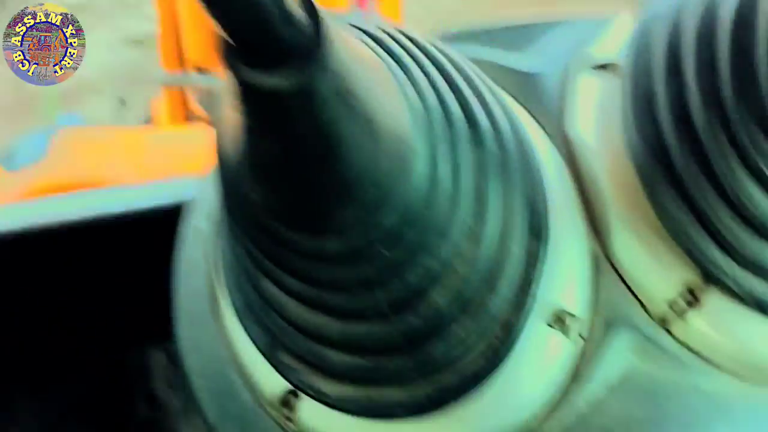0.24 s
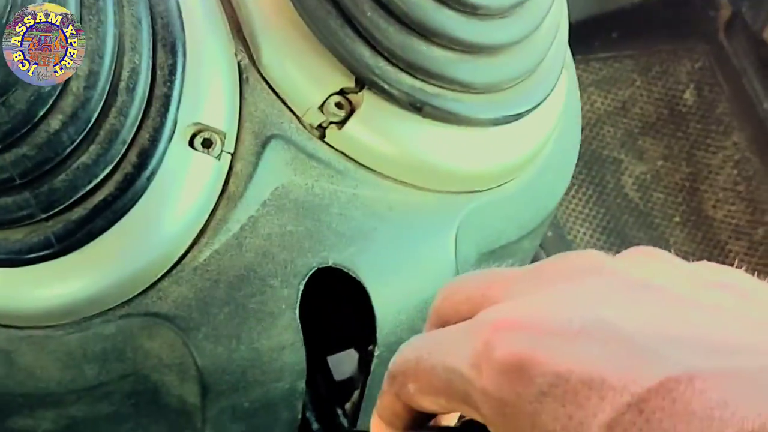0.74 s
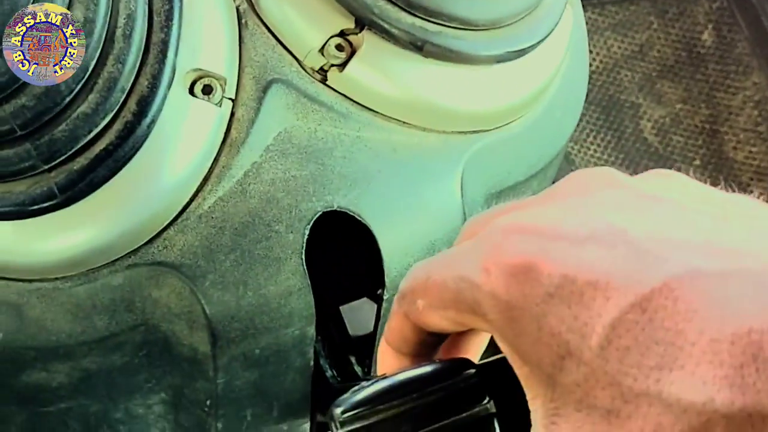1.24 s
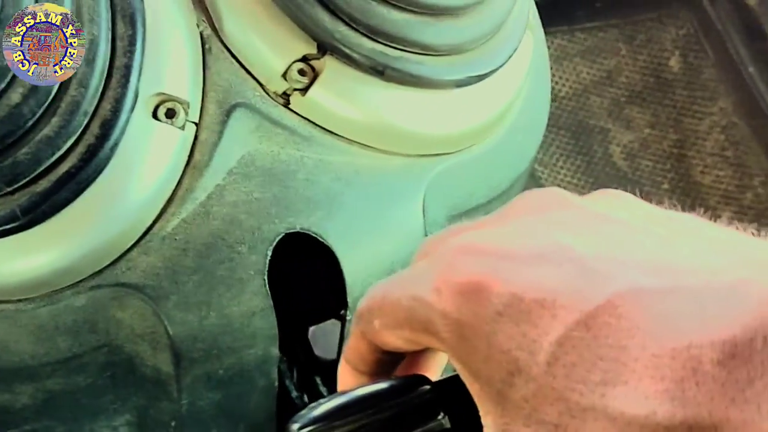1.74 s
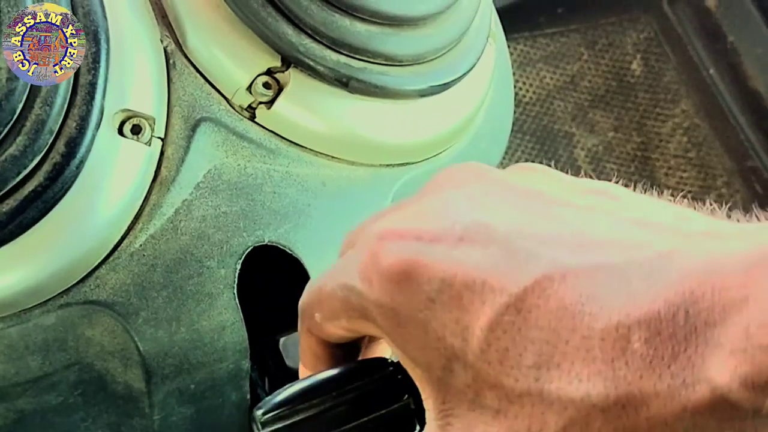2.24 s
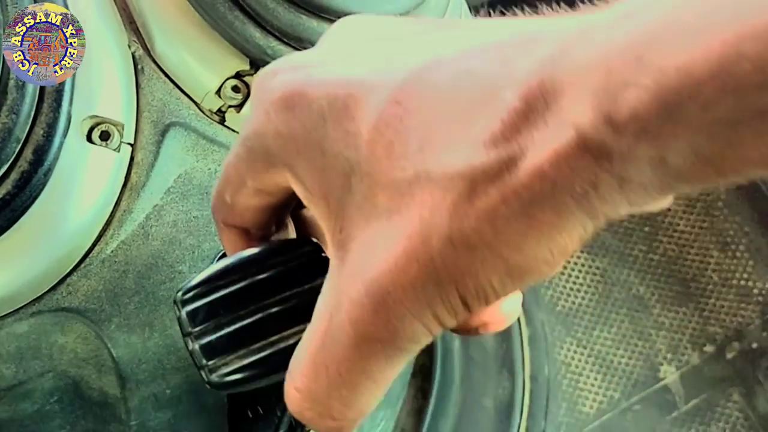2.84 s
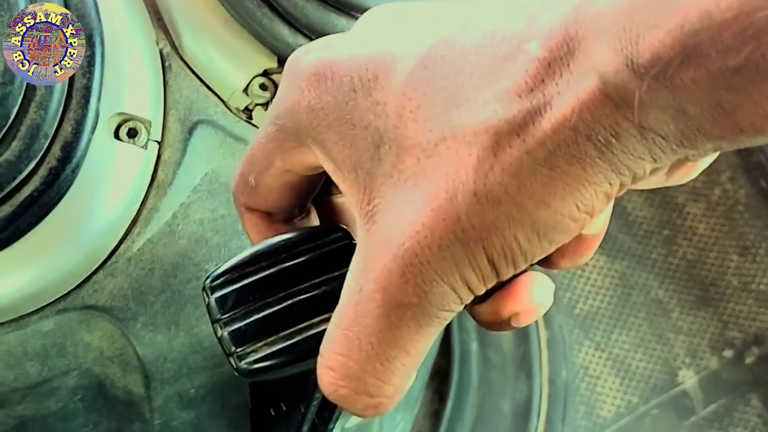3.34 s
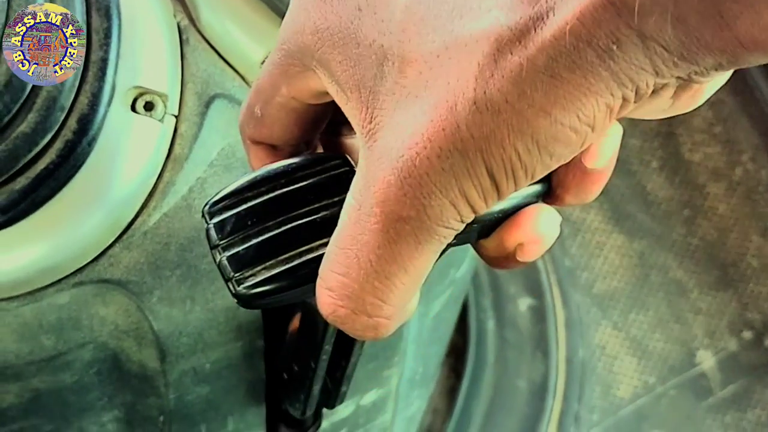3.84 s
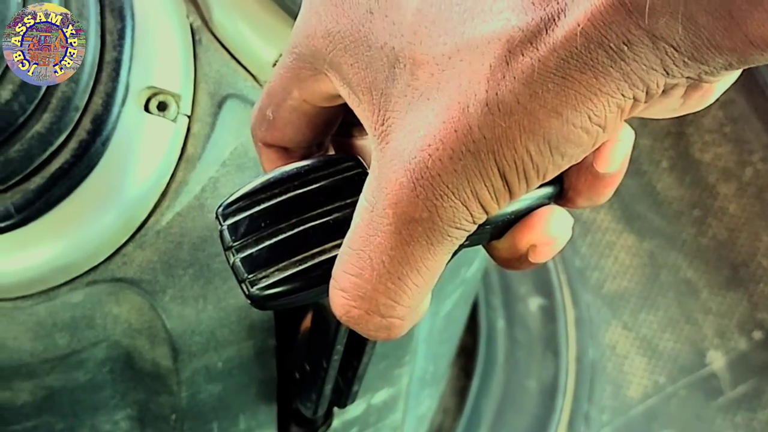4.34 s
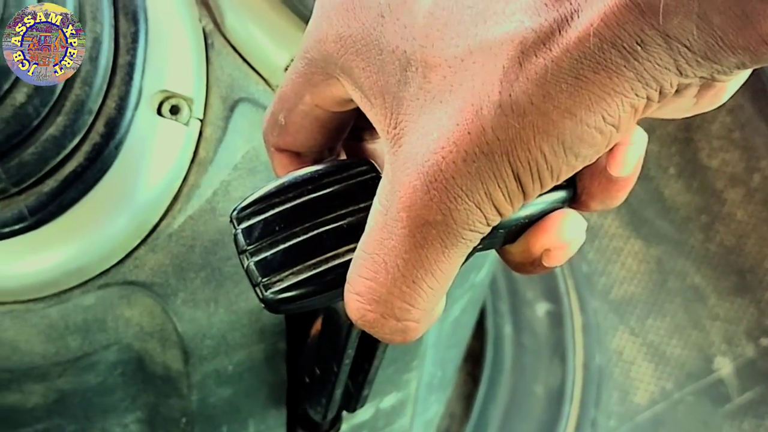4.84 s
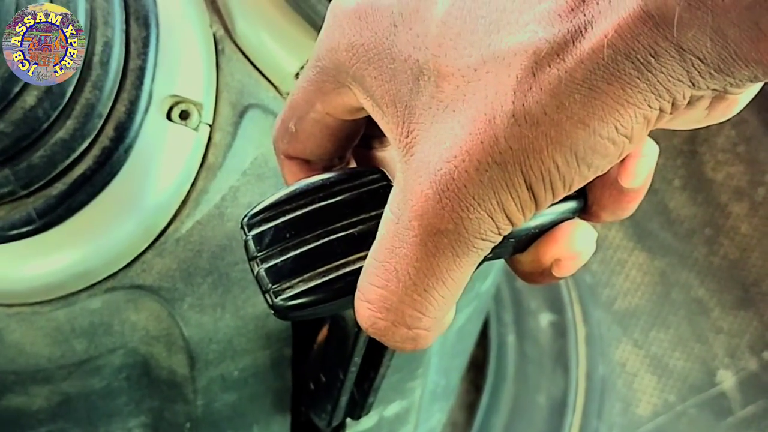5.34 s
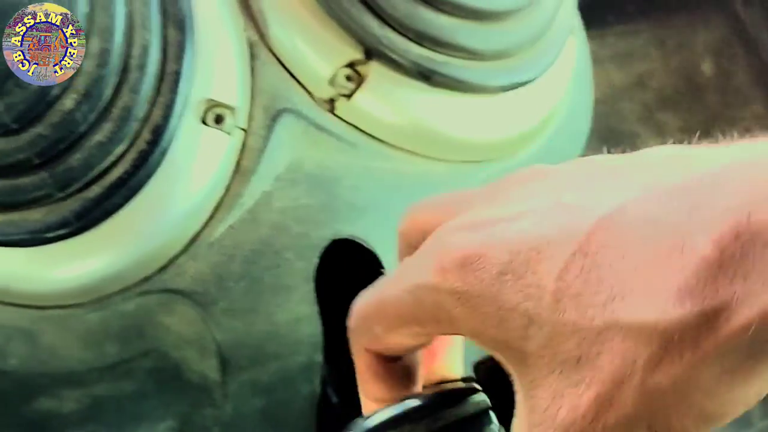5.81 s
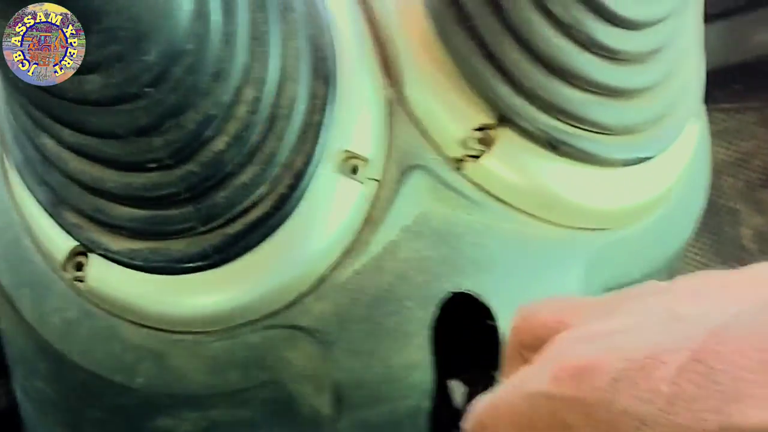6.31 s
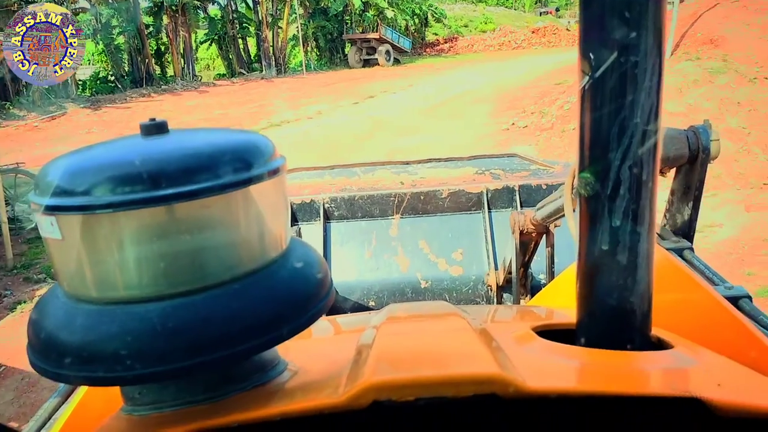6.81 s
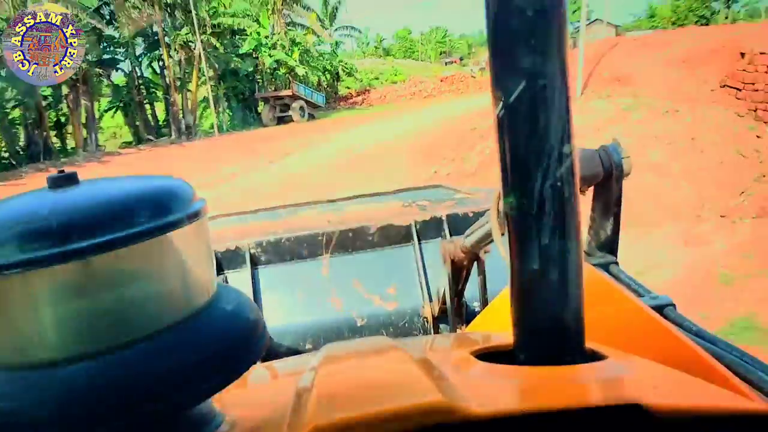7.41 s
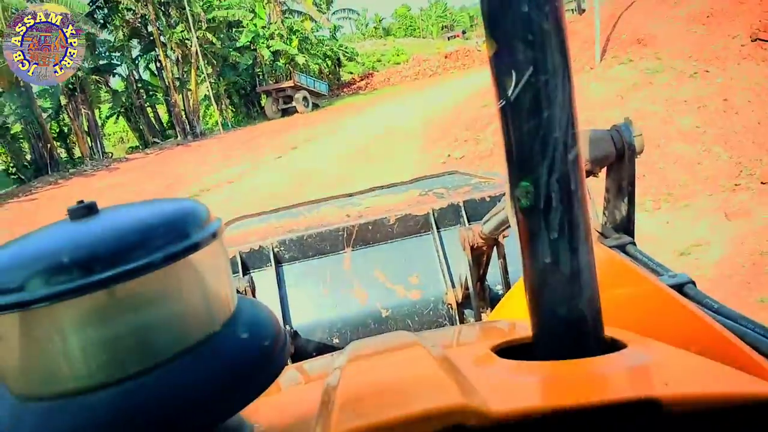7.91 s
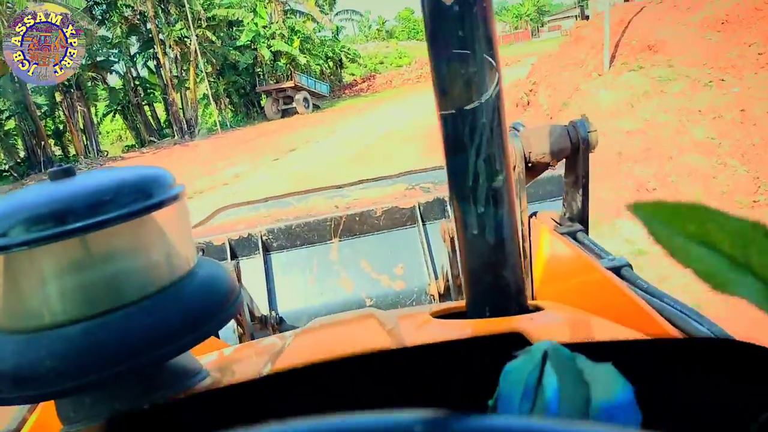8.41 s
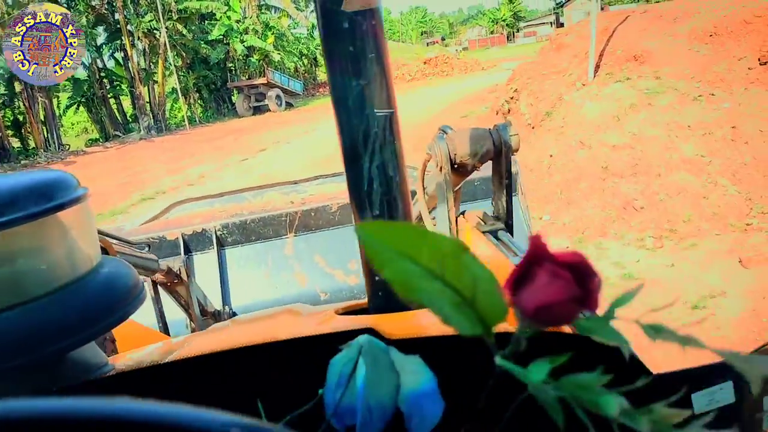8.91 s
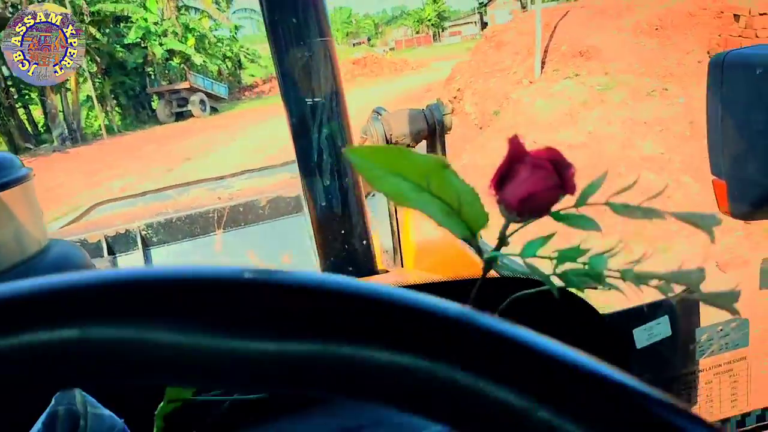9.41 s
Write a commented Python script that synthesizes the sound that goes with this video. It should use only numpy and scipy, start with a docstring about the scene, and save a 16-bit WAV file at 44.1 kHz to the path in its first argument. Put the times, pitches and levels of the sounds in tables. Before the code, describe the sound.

From 0 s a four-cylinder diesel runs just above idle inside a cab, about 33 firings a second, with low throb, boom, loose rattle and faint gear whine. At 2.7 s a lever opens the hydraulics: a tiny spurt, then thin high oil hiss, and the boom grows. At 3.7 s the valve opens fully; the engine sags slightly, booms harder and the hiss strengthens. Between 5.0 and 5.6 s muffled metal linkages judder, most strongly near 5.26 s, while the hiss shuts off and revs lift. Total silence lasts from 6.24 to 6.88 s. The engine then returns, swelling quickly, less boomy with brighter clatter. Faint knocks and taps lead to a sharp gritty scrape at left near 7.5 s. From 8.1 s it revs up with a brief overshoot, firmer and faster; a barely audible hiss fades by 9 s, boom recedes, and a faint clunk comes at 9.25 s.

```python
"""In the cab of a backhoe loader, a four-cylinder diesel runs near idle: tones and rattle locked to its firings.
A lever is pulled: the hydraulics take load, the cab booms at its air resonance, and oil hisses through the
valve as a turbulent jet. Linkages clunk as brief judders that ring the steel frame. After a short silent break
the microphone faces the bonnet; something brushes it with gritty noise and the engine picks up speed."""
import sys
import numpy as np
from scipy import signal
from scipy.fft import rfft, irfft
from scipy.io import wavfile
from scipy.ndimage import uniform_filter1d, map_coordinates

SR = 44100
rng = np.random.default_rng(int(sys.argv[2]) if len(sys.argv) > 2 else 0)


def digitize_waveform(pressure):
    """Quantize a signal to 16-bit integers and store it at the path in sys.argv[1].

    Rows of a 2-D input are taken as channels; values are limited to [-1, 1].
    """
    field = np.atleast_2d(pressure).T
    bounded = np.clip(field, -1, 1)
    quanta = np.round(bounded * 32767).astype(np.int16)
    wavfile.write(sys.argv[1], SR, quanta)


N = 426006
T = np.arange(N) / SR  # time, s
HZ = np.maximum(np.fft.rfftfreq(N, 1 / SR), 1)  # frequency axis, Hz
BREAK_S = (6.236, 6.883)  # start and end of the silence
BONNET = T > np.mean(BREAK_S)  # true once the microphone faces the bonnet
SIDES = np.array([[1], [-1]])  # sign of a left-right difference


def undb(db):
    """Level law: decibels become an amplitude ratio."""
    return 10 ** (np.asarray(db) / 20)


def unit(x):
    """Normalisation: scale to an rms of 1."""
    return x / np.sqrt(np.mean(x ** 2))


def colour(points):
    """Spectral envelope: (Hz, dB) points joined by straight lines over log frequency, as a gain."""
    hz, db = np.transpose(points)
    return undb(np.interp(np.log(HZ), np.log(hz), db))


def resonance(f, hz, width):
    """Simple resonator: the complex response of one damped mode, with gain 1 at its centre."""
    return 1 / (1 + 1j * (f / hz - hz / f) * hz / width)


def shape(x, gain):
    """Linear filtering: multiply the spectrum by a frequency response."""
    return irfft(rfft(x) * gain, N)


def noise():
    """Incoherence: two unrelated white noises."""
    return rng.standard_normal((2, N))


def walk(rate):
    """Slow fluctuation: low-passed noise of rms 1, its response halved at the rate in Hz."""
    return unit(shape(rng.standard_normal(N), 1 / (1 + (HZ / rate) ** 4)))


def since(s):
    """Elapsed time: seconds passed since a moment, zero before it."""
    return np.maximum(T - s, 0)


def ramp(s, length_s):
    """Smooth transition: a sine-squared move from 0 to 1."""
    return np.sin(np.pi / 2 * np.minimum(since(s) / length_s, 1)) ** 2


def lag(x, time_s):
    """First-order relaxation: follow a control sluggishly, with a time constant."""
    step = 1 / (time_s * SR)
    return signal.lfilter([step], [1, step - 1], x)


# Stereo width of the sound field. Each row: frequency in Hz, side minus mid level in dB.
WIDTH = [(60, -11.5), (150, -12), (320, -12), (550, -5), (1000, 1.5), (15000, -1.5)]


def spread(pair):
    """Diffuseness: unrelated mid and side sounds leave the bass alike in both ears and the treble diffuse."""
    mid, side = pair
    return mid + SIDES * shape(side, colour(WIDTH))


# Throttle settings. Each row: start in seconds, firing rate asked for in Hz.
THROTTLE = [(0, 33.47), (5.48, 34.72), (6.5, 32.12), (8.08, 36.7)]
HUNT_HZ, SETTLE_S = 2.4, .13  # rate of the governor's swing and its decay time


def governor():
    """Damped oscillation: the firing rate swings past each throttle setting and settles like a sprung mass."""
    hz = THROTTLE[0][1]
    w = 2 * np.pi * HUNT_HZ
    for (_, old), (s, new) in zip(THROTTLE, THROTTLE[1:]):
        age = since(s)
        swing = np.cos(w * age) + np.sin(w * age) / (w * SETTLE_S)
        hz = hz + (new - old) * (1 - np.exp(-age / SETTLE_S) * swing)
    return hz


REV_S = .22  # time constant with which the revved sound builds


def states(load):
    """Superposition: the shares of idling, under load, at the bonnet and revved add up to one."""
    revved = 1 - np.exp(-since(THROTTLE[-1][0]) / REV_S)
    return np.array([(1 - load) * ~BONNET, load * ~BONNET, (1 - revved) * BONNET, revved * BONNET])


# Base levels in dB, before effort and cab resonance: idling, under load, at the bonnet, revved.
THUD_DB = (-19.5, -18.5, -20.5, -17.5)
BOOM_DB = (-18, -11.2, -23.5, -18.5)
CLATTER_DB = (-30.5, -30.5, -32, -32)
# Extra fuel hardens the firings. Each lists dB added to thud, boom, clatter:
SURGE_DB = (-0.5, 9, 2)  # at the fastest run-up
STRAIN_DB = (.5, 2, 2.5)  # per unit of load not yet caught
# The boom fades as the microphone moves over to the steering wheel. Each row: time in seconds, change in dB.
BOOM_FADE = [(8.65, 0), (9.66, -4.5)]
CAB_HZ, CAB_WIDTH_HZ = 99, 15.8  # the air resonance that the third firing tone booms on
RETURN_DB, RETURN_S = -4.5, .14  # drop just after the break, and the time constant of its recovery


def levels(hz, state, surge, strain):
    """Forced resonance: state and effort set thud, boom and clatter in dB; the boom peaks at the right speed."""
    swell_db = RETURN_DB * BONNET * np.exp(-since(BREAK_S[1]) / RETURN_S)
    base_db = np.array([THUD_DB, BOOM_DB, CLATTER_DB]) @ state + swell_db
    effort_db = np.outer(SURGE_DB, surge) + np.outer(STRAIN_DB, strain)
    thud_db, boom_db, clatter_db = base_db + effort_db
    tuning_db = 20 * np.log10(np.abs(resonance(3 * hz, CAB_HZ, CAB_WIDTH_HZ)))
    fade_db = np.interp(T, *np.transpose(BOOM_FADE))
    return thud_db, boom_db + tuning_db + fade_db, clatter_db


# Exhaust and block tones. Each row: cycles per four firings, then mean level in dB relative to the cab boom
# when idling, under load, at the bonnet, revved.
DRONE = [(6, -30, -31, -23, -29), (8, -9.5, -14.5, -6, -10), (10, -10.5, -23, -26, -9),
         (11, -27.5, -37, -33, -26), (13, -22, -20, -36, -35), (14, -40.5, -49, -19, -41),
         (16, -29, -21, -16, -5), (20, -49, -40.5, -12.5, -19), (24, -39.5, -36, -14.5, -21),
         (28, -25, -21.5, -36, -27), (36, -18, -31.5, -17, -56)]


def drone(firings, hz, state, thud_db, boom_db, waver_db=2.0, panel_hz=208, panel_width=4.46, panel_db=-26):
    """Harmonic series of the firings: the third tone drives the cab air, the sixth a panel at its resonance."""
    def tone(order):
        # pipe and cab hold the higher tones back, which rounds each firing, more so by the bonnet
        phase_lag = np.where(BONNET, .5, .13) * order ** 2  # radians
        return np.sqrt(2) * np.cos(2 * np.pi * order * firings - phase_lag)

    thud = undb(thud_db) * tone(order=1)
    boom = undb(boom_db + .4 * walk(12)) * tone(order=3)
    out = thud + boom
    for cycles, *db in DRONE:
        level_db = boom_db + np.array(db) @ state + waver_db * walk(16)
        out += undb(level_db) * tone(order=cycles / 4)
    panel = np.abs(resonance(6 * hz, panel_hz, panel_width)) ** 2
    return out + undb(panel_db) * panel * tone(order=6)


def rumble(boom_db, state, cab_hz=104, cab_width=55, state_db=(-17, -19, -11, -9)):
    """Random excitation of a cavity: uneven combustion stirs the cab air between the tones."""
    air = unit(spread(shape(noise(), resonance(HZ, cab_hz, cab_width) ** 2)))
    return air * undb(boom_db + np.array(state_db) @ state)


def knocks(firings, state, flutter_db=1.06, knock=0.62, chatter_db=0.96):
    """Cyclic impacts: injectors, valves and gears rattle partly alike every four firings, the treble afresh."""
    cycle = firings / 4 % 1

    def each_cycle(size):
        # a random pattern of this many points, replayed once per cycle
        return map_coordinates(rng.standard_normal(size), [cycle * size], order=3, mode="grid-wrap")

    alike = np.array([.9, .42, .5, .4]) @ state  # power share that repeats
    pattern = np.array([each_cycle(size=5200) for _ in SIDES])
    repeated = np.sqrt(alike) * pattern + np.sqrt(1 - alike) * noise()
    # each firing is a knock that dies away; valves and gear teeth chatter between, at their own crank angles
    dying = 1 + knock * np.exp(-(firings % 1) / .3)
    blows = unit(dying * undb(chatter_db * each_cycle(size=48)))
    low_share = 1 / (1 + (HZ / 3400) ** 3)  # power share of the impacts at each frequency
    fizz = noise() * unit(undb(flutter_db * walk(85)))
    return spread(shape(repeated * blows, np.sqrt(low_share)) + shape(fizz, np.sqrt(1 - low_share)))


# Clatter spectra at the levers and at the bonnet. Each row: frequency in Hz, relative density in dB per Hz.
LEVER_COLOUR = [(60, -3), (140, 9.5), (200, -10.5), (430, -7.5), (600, -3), (1200, -3.5), (1550, -5.5),
                (1800, -9.5), (2600, -11), (2850, -14.5), (4500, -21.5), (5300, -27), (8000, -32.5),
                (9300, -43), (11000, -38), (15500, -44)]
BONNET_COLOUR = [(60, -32), (150, 6.5), (450, -3.5), (1100, -5), (1500, -5.5), (2600, -27), (2900, -15),
                 (5000, -17.5), (5700, -24.5), (8100, -29), (9300, -36), (12300, -37), (15500, -41)]
# Stereo balance at the two places. Each row: frequency in Hz, left minus right level in dB.
LEVER_BALANCE = [(60, 1), (110, -19), (200, 12.5), (380, 0), (700, -2), (1290, -6.5), (2380, -3.5),
                 (4400, -2), (8120, 5), (15000, -4.5)]
BONNET_BALANCE = [(60, -0.5), (110, 9), (200, -1.5), (380, -1), (700, -1), (1290, -2), (2380, -6),
                  (4400, -5.5), (8120, 1.5), (15000, -3.0)]
# Resonances of panels and cab air. Each row: frequency in Hz, width in Hz, then relative boost in dB
# when idling, under load, at the bonnet, revved.
PANELS = [(234, 18, 4.5, 8, 3.5, 0), (319, 124, 15.5, 17, 9.5, 7.5), (440, 41, -2.5, 0, -3.5, 6.5),
          (512.7, 120, 4, 5, 10.5, 9.5), (730, 65, 2, -0.5, 6, 1), (831, 120, 0.5, 3, 7, 9),
          (1002, 50, 2.5, 1.5, 9, 7), (1139, 38, 5.5, -6, 8, 9), (1243, 170, 2, 2, 5.5, 2.5),
          (1978, 410, 0.5, 0, 12.5, 10.5), (2350, 440, 2.5, 1, 15.5, 15), (2594, 230, 1.5, 0.5, 13, 13.5),
          (3635, 180, 4.5, 0.5, 0, 2)]


def clatter(firings, state, clatter_db):
    """Structural transmission: the rattle passes through panels that ring differently with load and speed."""
    rattle = rfft(knocks(firings, state))
    out = 0
    band = (HZ > 900) & (HZ < 4000)  # the band that sets the level of each spectrum
    peaks = np.array([np.abs(resonance(HZ, hz, width)) ** 2 for hz, width, *_ in PANELS])
    boosts_db = np.array([row[2:] for row in PANELS]).T @ peaks
    views = [(LEVER_COLOUR, LEVER_BALANCE)] * 2 + [(BONNET_COLOUR, BONNET_BALANCE)] * 2
    for share, boost_db, (points, balance) in zip(state, boosts_db, views):
        gain = colour(points) * undb(boost_db)
        gain = gain / np.sqrt(np.mean((gain * band) ** 2))
        out = out + share * irfft(rattle * gain * colour(balance) ** (SIDES / 2), N)
    return undb(clatter_db) * out


# Pump and gear tones. Each row: multiple of the firing rate, then mean level in dB when idling, under load,
# at the bonnet, revved, then left minus right level in dB.
WHINE = [(9.75, -32, -45, -41.5, -33.5, 0), (10, -50, -35, -55, -48, 0), (16.25, -55.5, -51.5, -47, -54, 1),
         (19.5, -42.5, -43.5, -48, -44, 13), (26, -60, -44, -48, -52, 0), (26.25, -58, -42, -50, -50, 0),
         (29.25, -41.5, -45, -45, -52, -0.5), (35, -44, -56, -60.5, -61, -12),
         (36, -53, -57.5, -44.5, -52.5, -14), (40, -48, -36, -53, -58, -1), (45, -45, -54, -62, -62, -2),
         (68.5, -52, -60, -60, -60, -2), (78, -60, -50, -61, -62, -2.5)]


def whine(firings, state, waver_db=1.5, wobble=0.18):
    """Tooth meshing: pump teeth and timing gears sing at fixed multiples of the engine speed."""
    out = 0
    for multiple, *db, pan_db in WHINE:
        level_db = np.array(db) @ state + waver_db * walk(9.3)
        gain = undb(level_db) * undb(SIDES * pan_db / 2)
        phase = 2 * np.pi * multiple * firings + wobble * walk(25)  # wobble in radians
        out = out + gain * np.sqrt(2) * np.sin(phase)
    return out


# Lever moves. Each row: start in seconds, new valve setting from 0 to 1, length of the move in seconds.
LEVER = [(2.66, .42, .16), (3.66, 1, .11), (5.55, 0, .1)]


def lever():
    """Flow control: the valve glides to each new setting and stays there."""
    valve = np.zeros(N)
    for s, new, length_s in LEVER:
        valve = valve + (new - valve) * ramp(s, length_s)
    return valve


def opening(setting):
    """Port overlap: the valve opens wide over the upper half of its travel."""
    return np.clip(2 * setting - 1, 0, 1)


# Resonances of the oil jet. Each row: frequency in Hz, width in Hz, relative dB half open, dB fully open.
JET = [(5900, 1500, -6, 4.5), (7350, 1100, 7, 8), (11120, 900, -1, 4.5), (12600, 1100, 4.5, -2),
       (14670, 950, 2.5, -1), (9070, 20000, -14, -24)]
# The jet spurts as the valve cracks open and as it shuts. Each row: time in seconds, level in dB.
SPURTS = [(2.685, -42), (5.555, -68)]
OIL_DB, SPURT_S = -42.5, 0.02  # mean hiss with the valve wide open; half-length of a spurt


def oil(valve, pan_db=2, flicker_db=1):
    """Turbulent jet noise: oil squeezed through the valve hisses in resonances that shift as it opens."""
    flow = noise()
    peaks = np.array([np.abs(resonance(HZ, hz, width)) ** 2 for hz, width, *_ in JET])
    gains = undb([row[2:] for row in JET]).T @ peaks
    half, full = (unit(shape(flow, gain)) for gain in gains)
    jet = half + opening(valve) * (full - half)
    spurts = sum(undb(db) * np.exp(-((T - s) / SPURT_S) ** 2) for s, db in SPURTS)
    strength = undb(OIL_DB) * valve + spurts
    return jet * strength * undb(flicker_db * walk(18) + SIDES * pan_db / 2)


# Modes of the steel frame. Each row: frequency in Hz, relative level in dB, 60 dB decay time in seconds.
FRAME = [(162, 17.5, 0.078), (243, -3, 0.076), (297, 8, 0.049), (336.5, 10, 0.023), (422, -6, 0.034),
         (463, 14, 0.1), (525, 5, .04), (657, -10.5, 0.0273), (772, -19, 0.034), (934, -17, 0.06)]
# Knocks of loose pins and linkages. Each row: time in seconds, relative blow in dB, bright crack in dB
# relative to that blow.
CLUNKS = [(5.03, -32, -18), (5.262, -13.5, -9), (5.299, -19.5, -8.5), (5.324, -19, -2),
          (5.385, -19.5, -23.5), (5.425, -23.5, -24.5), (5.497, -15.5, -25), (5.54, -37, -25),
          (5.6, -28, -22), (7.17, -25.5, -25), (7.461, -24, -22.5), (9.246, -25, -18)]


def clunks(attack_s=0.0036, contact_s=0.025, slack_db=-14, slack_s=0.073, judder_db=3,
           crack_hz=1900, crack_width=1500, ring_db=-1, crack_gain_db=-6, muffle_hz=2300):
    """Impact and modal response: a short judder rings the frame, the pin cracks brighter, the cab muffles both."""
    ring = sum(undb(db) * resonance(HZ, hz, np.log(1000) / np.pi / t60) for hz, db, t60 in FRAME)
    push, crack = np.zeros(N), np.zeros(N)
    for s, db, crack_db in CLUNKS:
        age = since(s)
        # the blow dies quickly, the slack part rattles on a little
        decay = np.exp(-age / contact_s) + undb(slack_db) * np.exp(-age / slack_s)
        blow = undb(db) * (1 - np.exp(-age / attack_s)) * decay
        push = push + blow
        crack = crack + blow * undb(crack_db)
    judder = noise() * unit(undb(judder_db * walk(150)))

    def rung(force, response):
        response = response / (1 + (HZ / muffle_hz) ** 4)
        return shape(force * judder, response / np.sqrt(np.mean(np.abs(response) ** 2)))

    frame = undb(ring_db) * rung(push, ring)
    pin = undb(crack_gain_db) * rung(crack, resonance(HZ, crack_hz, crack_width) ** 2)
    return spread(frame + pin)


# Spectrum of the brushing. Each row: frequency in Hz, relative density in dB per Hz.
BRUSH_COLOUR = [(1500, -28), (3200, -4), (5000, -4), (6800, 0), (9500, -8), (12000, -4), (15500, -4)]
# Light taps at the left port. Each row: time in seconds, starting level in dB.
TAPS = [(7.24, -38), (7.4605, -23)]
TAP_S = .0017  # decay time of a tap
BRUSH_LANDS_S, BRUSH_SLIPS_S = 7.461, 7.499  # moments of contact and of slipping off
BRUSH_DB, BRUSH_TAIL_DB = -15.5, -17  # scrape level as it slips; tail relative to that
BRUSH_RISE_S, BRUSH_RELEASE_S, BRUSH_TAIL_S = .012, .001, .011  # time constants


def brush(grain_db=3, right_db=-20):
    """Sliding friction: light taps and a gritty scrape at the left port press harder and harder, then slip off."""
    grains = rng.standard_normal(N) * undb(grain_db * walk(840))
    grit = unit(shape(grains, colour(BRUSH_COLOUR)))
    press = (T > BRUSH_LANDS_S) * np.exp(np.minimum(T - BRUSH_SLIPS_S, 0) / BRUSH_RISE_S)
    off = since(BRUSH_SLIPS_S)
    release = np.exp(-off / BRUSH_RELEASE_S) + undb(BRUSH_TAIL_DB) * np.exp(-off / BRUSH_TAIL_S)
    scrape = undb(BRUSH_DB) * press * release
    taps = sum(undb(db) * (T > s) * np.exp(-since(s) / TAP_S) for s, db in TAPS)
    return grit * (scrape + taps) * undb([[0], [right_db]])


def thin_hiss(db=-59, hz=12200, width_hz=3000, fade_s=.2, start=7.62, end=8.85):
    """Band-limited jet noise: a faint high hiss, probably the loader's valve, fades in, holds and fades out."""
    jet = unit(shape(noise(), resonance(HZ, hz, width_hz) ** 2))
    return jet * undb(db) * (ramp(start, fade_s) - ramp(end, fade_s))


PRESSURE_S, FUEL_S = 0.069, 0.055  # lag of pump load behind the valve; of extra fuel behind a run-up
RECOVER_S = .16  # time constant for catching a new load
BOG_HZ, DROOP_HZ = 1.7, .66  # firing rate lost per unit of strain; and with the valve wide open


def scene():
    """Common drive: throttle and lever set speed and effort; one crankshaft times every engine tone and knock."""
    valve, governed = lever(), governor()
    load = lag(valve, PRESSURE_S)
    strain = np.maximum(valve - lag(valve, RECOVER_S), 0)  # load not yet caught
    surge = lag(np.maximum(np.gradient(governed), 0), FUEL_S)  # extra fuel during a run-up
    state = states(load)
    unsteady = 1 + (.0003 + .0009 * state[-1]) * walk(5)
    hz = (governed - DROOP_HZ * opening(load) - BOG_HZ * strain) * unsteady
    thud_db, boom_db, clatter_db = levels(hz, state, surge / surge.max(), strain)
    firings = np.cumsum(hz) / SR  # count of firings so far
    engine = drone(firings, hz, state, thud_db, boom_db) + rumble(boom_db, state)
    engine = engine + clatter(firings, state, clatter_db) + whine(firings, state)
    return engine + oil(valve) + clunks() + brush() + thin_hiss()


def record(dry, top_hz=15550):
    """Saturation and band limiting: a silent break, rounding of the loudest crests, and a steep treble cut."""
    running = uniform_filter1d(1. * ((T < BREAK_S[0]) | (T > BREAK_S[1])), size=90)
    rounded = dry / (1 + (dry / .95) ** 6) ** (1 / 6)
    treble_cut = signal.ellip(10, .2, 80, top_hz, fs=SR, output="sos")
    return signal.sosfilt(treble_cut, rounded * running)


dry = scene()
out = record(dry)
digitize_waveform(out)
```